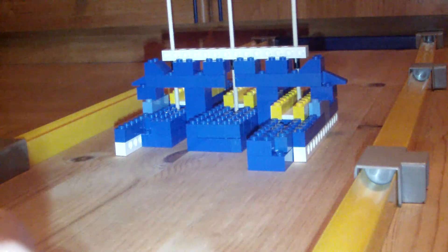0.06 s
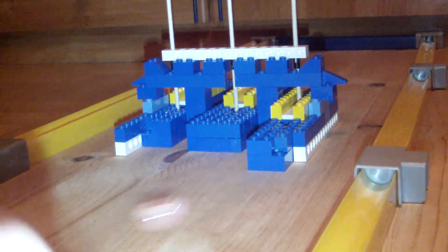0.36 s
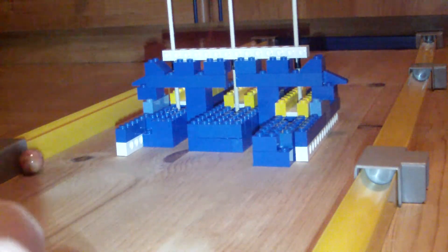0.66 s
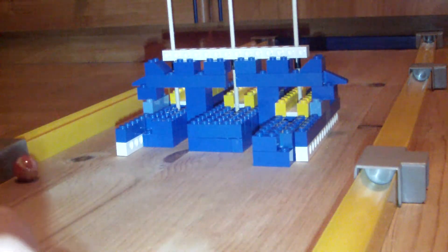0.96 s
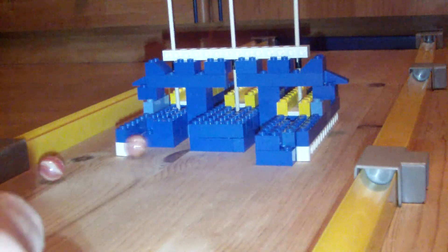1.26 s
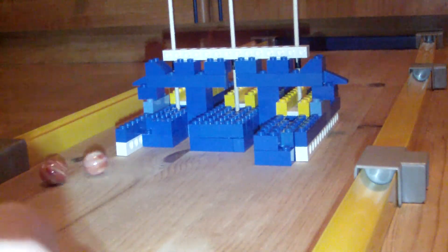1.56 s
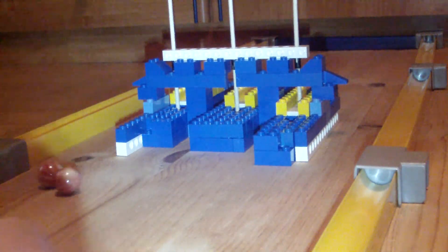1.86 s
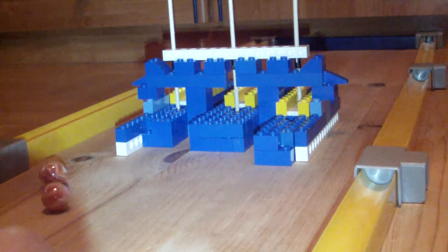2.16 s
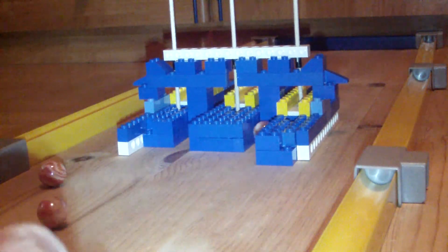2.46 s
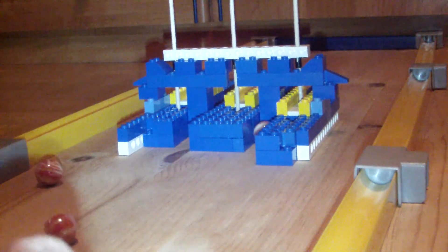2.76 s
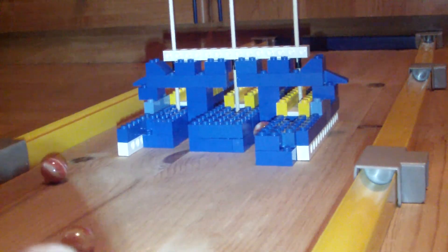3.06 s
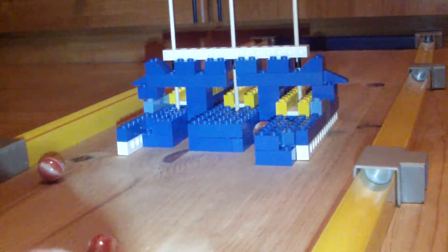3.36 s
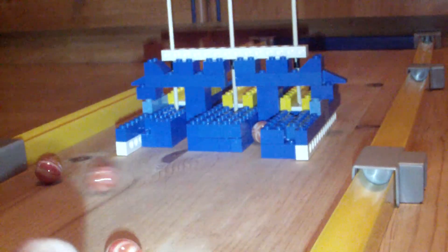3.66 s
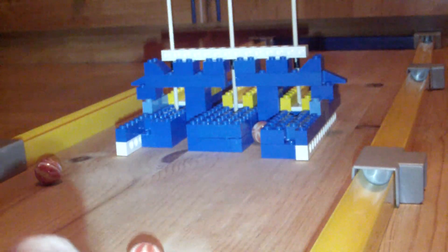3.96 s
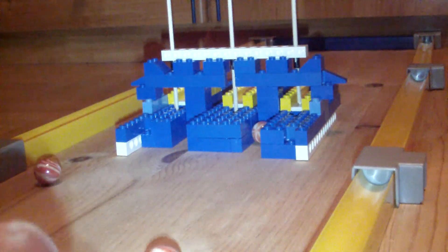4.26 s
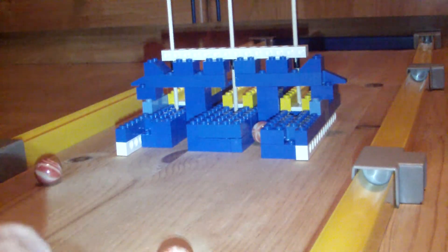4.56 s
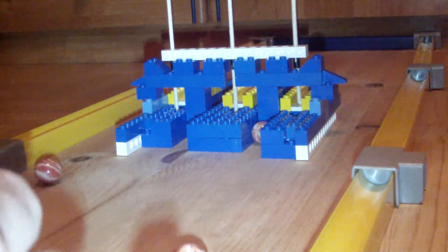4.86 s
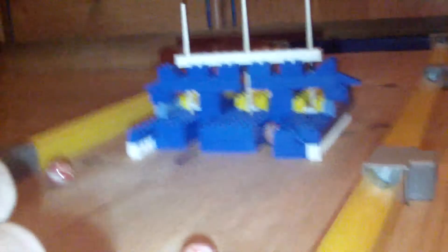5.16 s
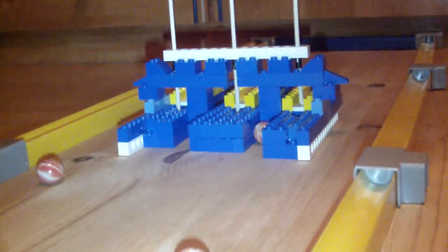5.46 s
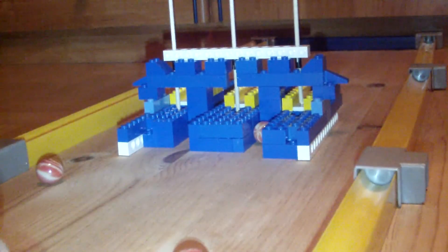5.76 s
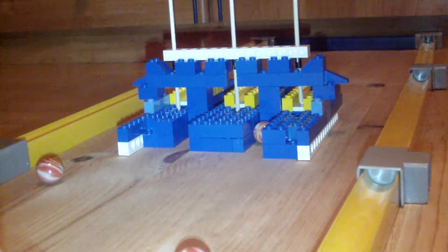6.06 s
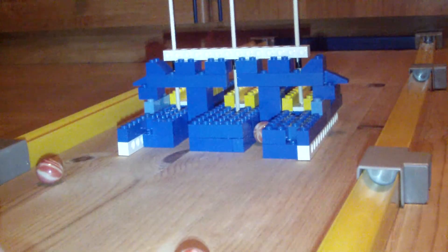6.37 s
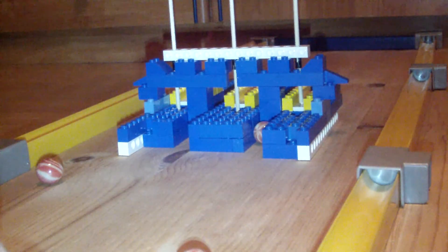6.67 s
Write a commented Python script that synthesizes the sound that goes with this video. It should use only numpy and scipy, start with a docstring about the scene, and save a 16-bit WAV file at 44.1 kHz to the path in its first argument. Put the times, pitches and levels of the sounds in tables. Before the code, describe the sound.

A toy launcher snaps at about 0.3 seconds, and a glass marble bounces on a wooden board with hollow knocks, rolls briefly and clacks brightly against plastic bricks. More shots come at 1.0, 2.2 and 3.4 seconds, each followed by knocks, a faint grainy roll and a quick burst of hard clacks and rattles. At 1.3 and 2.3 seconds a hit leaves a thin, high ring in a metal rail. From 4 to 5 seconds there are only soft ticks. Just after 5 seconds a loud, low thump jolts the microphone, followed by plastic clatter until 5.5. After a short pause, a small ping at 6.2 seconds leads into a last dense run of clacks up to about 6.8. Everything is close, in a small, quiet room with little echo, and the hardest hits slightly overload the microphone.

```python
"""Glass marbles clatter among plastic bricks and rails on a wooden board in a small room.
A toy launcher flicks them off with a snap of its lever; they bounce with hollow knocks, roll with
a grainy rattle and hit the bricks in bright bursts of clacks, now and then setting a metal rail singing.
Jolts thump through the support of a nearby camera, whose microphone overloads on the hardest hits."""
import sys
import numpy as np
from scipy import signal
from scipy.fft import rfft, irfft, next_fast_len
from scipy.io import wavfile

SR = 44100
rng = np.random.default_rng(int(sys.argv[2]) if len(sys.argv) > 2 else 0)


def pcm_store(signal):
    """Save signal as 16-bit PCM."""
    levels = np.round(np.clip(np.atleast_2d(signal), -1, 1) * 32767)
    wavfile.write(sys.argv[1], SR, levels.astype(np.int16).T)


N = 300762
SIZE = 16384  # samples in a one-shot
T = np.arange(SIZE) / SR
HZ = np.fft.rfftfreq(SIZE, 1 / SR)

# room tone EQ: freq_hz, level_db
HUSH_EQ = [(25,-5.5),(150,-10.5),(400,-19.5),(750,-26),(1000,-26.5),(1500,-33.5),(5000,-38),(16000,-45)]
# reverb time of the room: freq_hz, t60_s
ROOM_DECAY = [(200, 0.31), (1500, 0.27), (5000, 0.22), (14000, 0.022)]
# jolts through the camera's support: start_s, level_db, pitch_hz, t60_s
CAMERA_JOLTS = [(3.356,-17,46.8,0.096),(5.055,0,58.4,0.093),(5.062,7,514,0.01),(5.064,3,1100,0.0095),(5.136,-18,37.8,0.29),(5.207,-17,31.6,0.31)]
# marbles rolling over the board: start_s, length_s, level_db
ROLL_CUES = [(.3,.33,-38),(1.08,.23,-32),(1.6,0.93,-71),(2.3,0.09,-35.5),(2.55,0.089,-53.5),(3.42,0.067,-26),(3.78,0.072,-39.5),(4,0.18,-58),(4.55,0.18,-56.5),(5.19,0.34,-48),(5.597,.25,-55.5),(6.42,0.2,-41.5),(6.76,0.096,-34)]
# EQ of their rattle: freq_hz, level_db
RATTLE_EQ = [(100, -28), (600, -7.5), (1000, 0.5), (1800, -3.5), (4000, -6), (6500, -5), (10000, -16),
             (16000, -24)]
# marbles rolling close by: start_s, length_s, level_db
RUMBLE_CUES = [(1.05,.45,-49),(2.45,.42,-48)]
# EQ of their rumble: freq_hz, level_db
RUMBLE_EQ = [(25,2),(50,-11.5),(200,-20),(400,-41)]
# hits that set a metal rail singing: start_s, level_db
RAIL_HITS = [(1.28,-35),(2.328,-27)]
# a marble on one small part: start_s, level_db, pitch_hz, t60_s
PING_HITS = [(6.157,-20.5,3600,.015),(6.157,-27.5,1405,.014),(6.772,-25.5,2860,0.06)]
# blows on the board (a big loss is a dead stop): start_s, level_db, centre_hz, bounce_loss_db
BOARD_KNOCKS = [(.332,-7,1824,5.5),(0.597,-12,1230,40),(1.065,-7.5,1850,5),(1.276,-16,1264,40),(2.253,-5.5,1798,4.5),(3.357,-12.5,1223,40),(3.465,-6,1853,9),(5.125,-27,1140,38.5)]
# hollow tone of the board: ratio_to_centre, level_db
WOOD_EQ = [(.06,-33.5),(.36,-27),(.52,-8.5),(.72,2.5),(1.4,-1),(2.05,-10.5),(2.6,-17.5),(3.6,-28.5),(8,-39)]
# crack of a hard hit on plastic: freq_hz, level_db
CRACK_EQ = [(60, -22.5), (300, -14.5), (620, -13.5), (1000, 1.5), (1800, -8), (3000, -7.5), (4300, -5),
            (5500, -3), (7200, -6), (9500, -13), (12000, -21.5), (16000, -29.5)]
# modes of the bricks on their board: pitch_hz, level_db
BRICK_MODES = [(1020,-5),(1320,-1.5),(2170,6),(2900,4),(3630,5.5),(5100,-1.5),(5720,-2.5),(6960,6),(9080,-0.5),(10900,-21.5)]
# launcher shots (body is the EQ near 1 kHz): start_s, level_db, body_db, bright_db
LAUNCHER_SHOTS = [(.256,-8,0.5,5),(.969,-12,4,4.5),(2.154,-11.5,2,5.5),(3.358,-6.5,0.5,3)]
# quick, fading rattles of plastic, from bricks or the launcher: start_s, level_db, fall_db_per_s, body_db
PLASTIC_RATTLES = [(.29,-15.5,331,0.5),(.58,-10.5,298.5,4.5),(.606,-10,228.5,1),(1.308,-12,203,3.5),(2.536,-19.5,404,2.5),(3.819,-18,221.5,-5),(5.096,-14.5,1003,-18.5),(5.173,-21,350.5,-22),(5.211,-16.5,388,-12),(5.327,-22,250,-6),(5.386,-16.5,239,-14.5),(6.549,-19,180,-9)]
# hard plastic clacks from marbles or the handled launcher: start_s, level_db, body_db, bright_db
PLASTIC_CLACKS = [(.378,-9,2.5,4),(.547,-27.5,0.5,-1),(.571,-17,4,2.5),(.6,-2.5,-4,1.5),(.626,-8,-1.5,4.5),(0.681,-19,-2,5),(.723,-27,-3,4),
                  (1.002,-18.5,-4.5,-2.5),(1.105,-15.5,4.5,3),(1.143,-12.5,-1,1.5),(1.179,-18,-8.5,-7),(1.214,-20,-3,5.5),(1.255,-20,-8.5,-4.5),(1.279,-7,19.5,5.5),(1.303,-7,7,6.5),(1.366,-14.5,-2.5,4),(1.435,-33.5,-2,4.5),
                  (2.309,-22,-5.5,-4),(2.33,-7.5,-13.5,6.5),(2.437,-18.5,-13,-6.5),(2.51,-29,0.5,5),(2.53,-16.5,7.5,8),(2.561,-12,-14.5,1.5),(2.651,-31,20,0),(2.667,-20.5,3,-2),(2.69,-24.5,0,6),(2.835,-41.5,4,-9),(3.048,-46,17.5,-10),
                  (3.409,-12.5,-3,6.5),(3.433,-6,-4,5),(3.47,-8,-6,2),(3.501,-6,1.5,3),(3.64,-17.5,-3.5,-6.5),(3.722,-13.5,-6.5,-3),(3.746,-16,8,-3.5),(3.796,-12.5,2,6),(3.814,-7.5,-4,-6.5),(3.984,-37.5,-16,-2.5),
                  (4.138,-37,6,4),(4.284,-41,13.5,-3.5),(4.432,-32,4.5,-12),(4.518,-28.5,12.5,3),(4.769,-34,-5,-1),(4.856,-39,-14,-4.5),
                  (5.059,-12,-0.5,-1.5),(5.093,-15,-14.5,8),(5.168,-12.5,-14,8.5),(5.204,-14,-12,4),(5.221,-19.5,-19,5),(5.35,-12,-14,3.5),(5.379,-6,-10,2.5),(5.478,-20.5,-6,3),(5.733,-38,-20,-5),
                  (6.31,-22,-9.5,1),(6.352,-28.5,2,-1.5),(6.384,-17.5,1.5,-0.5),(6.41,-9,-3,6),(6.438,-22,-2,1),(6.461,-11.5,5,-1),(6.47,-18,-12,3),(6.496,-5,3,4.5),(6.531,-13.5,4,2.5),(6.577,-19.5,-12,13),(6.601,-17,-7,0.5),(6.686,-21,3,3.5),(6.716,-8.5,-1,4.5),(6.79,-7.5,-3,1)]


def amp(db):
    """Decibels to gain."""
    return 10 ** (np.asarray(db) / 20)


def fade(t, t60):
    """Exponential decay that loses 60 dB in t60 seconds."""
    return np.exp(-np.log(1000) * t / np.maximum(t60, 1e-3))


def unit(x):
    """Scale to rms 1."""
    return x / np.sqrt(np.mean(x ** 2) + 1e-20)


def unit_attack(x):
    """Scale a hit so that its first 6 ms have rms 1."""
    return x / np.sqrt(np.mean(x[:round(.006 * SR)] ** 2) + 1e-20)


def along(points, hz):
    """Read a curve of breakpoints on a log frequency axis."""
    freqs, values = np.transpose(points)
    return np.interp(np.log(hz + 1e-6), np.log(freqs), values)


def track_eq(x, gain):
    """EQ a whole track; gain is a function of frequency."""
    size = next_fast_len(N + SIZE)
    return irfft(rfft(x, size) * gain(np.fft.rfftfreq(size, 1 / SR)), size)[:N]


def hit_eq(x, curve_db):
    """Minimum-phase EQ for a one-shot, so nothing sounds before the contact."""
    cepstrum = irfft(np.log(amp(curve_db)))
    cepstrum[1:SIZE // 2] *= 2
    cepstrum[SIZE // 2 + 1:] = 0
    return irfft(rfft(x) * np.exp(rfft(cepstrum)))


def add(track, start_s, sound):
    """Mix a sound into the track at its cue."""
    start = max(round(start_s * SR), 0)
    part = track[start:start + len(sound)]
    part += sound[:len(part)]


def room_tone(level_db):
    """A quiet bed of room rumble and microphone hiss."""
    return amp(level_db) * unit(track_eq(rng.standard_normal(N), lambda hz: amp(along(HUSH_EQ, hz))))


def in_room(hit, tail_db, wall_db, wall_s):
    """The dry hit, a scattered slap off the nearest wall and a diffuse tail that darkens."""
    hz, t, spectrum = signal.stft(rng.standard_normal(SIZE), SR, nperseg=256)
    tail = signal.istft(spectrum * fade(t, along(ROOM_DECAY, hz)[:, None]), SR, nperseg=256)[1][:SIZE]
    tail *= 1 - np.exp(-(T / 0.0066) ** 2)
    wall = rng.standard_normal(SIZE) * (T > wall_s) * fade(np.abs(T - wall_s), t60=0.064)
    reverb = amp(tail_db) * tail / np.linalg.norm(tail) + amp(wall_db) * wall / np.linalg.norm(wall)
    return hit + signal.fftconvolve(hit, reverb)[:SIZE]


def thump(pitch_hz, t60):
    """A quickly damped swing with a soft attack."""
    return np.sin(2 * np.pi * pitch_hz * T) * fade(T, t60) * (1 - np.exp(-T / 0.0022))


def camera_jolts():
    """The camera rocks with a low thump; the hardest jolt also knocks its case."""
    out = np.zeros(N)
    for start_s, level_db, pitch_hz, t60 in CAMERA_JOLTS:
        add(out, start_s, amp(level_db) * thump(pitch_hz, t60))
    return out


def roll_envelope(cues, rise_db_per_s=699, fall_db_per_s=108):
    """Each roll comes in fast, holds and dies away."""
    t = np.arange(N) / SR
    gain = np.zeros(N)
    for start_s, length_s, level_db in cues:
        attack_db = rise_db_per_s * np.maximum(start_s - t, 0)
        release_db = fall_db_per_s * np.maximum(t - start_s - length_s, 0)
        gain += amp(level_db - attack_db - release_db)
    return gain


def rolling(ticks_per_s, tick_t60, rub_db):
    """Marbles ride the wood grain: tiny uneven bumps on a smooth rub, and a rumble when they come near."""
    sizes = amp(rng.uniform(-14, 0, N))
    ticks = (rng.random(N) < ticks_per_s / SR) * sizes
    bumps = signal.fftconvolve(ticks, fade(T, tick_t60))[:N]
    contact = unit(bumps * rng.standard_normal(N)) + amp(rub_db) * rng.standard_normal(N)
    rattle = unit(track_eq(contact, lambda hz: amp(along(RATTLE_EQ, hz))))
    rumble = unit(track_eq(rng.standard_normal(N), lambda hz: amp(along(RUMBLE_EQ, hz))))
    return roll_envelope(ROLL_CUES) * rattle + roll_envelope(RUMBLE_CUES) * rumble


def metal_rail(ring_hz, half_width_hz, t60):
    """A struck metal rail sizzles on in a tight cluster of high modes."""
    envelope = np.zeros(N)
    for start_s, level_db in RAIL_HITS:
        add(envelope, start_s, amp(level_db) * fade(T, t60))
    sizzle = track_eq(rng.standard_normal(N), lambda hz: 1 / (1 + ((hz - ring_hz) / half_width_hz) ** 2))
    return envelope * unit(sizzle)


def snap(t60):
    """The transient of a hard contact: a noise burst with a sharp attack."""
    return rng.standard_normal(SIZE) * fade(T, t60) * (1 - np.exp(-T / .0005))


def pings(crack_db):
    """A marble hits a small part: one clear, well-damped note over a broad crack."""
    out = np.zeros(N)
    for start_s, level_db, pitch_hz, t60 in PING_HITS:
        ring = unit_attack(np.sin(2 * np.pi * pitch_hz * T) * fade(T, t60) * (1 - np.exp(-T / .0003)))
        crack = unit_attack(hit_eq(snap(t60), along(WOOD_EQ, HZ / pitch_hz)))
        ping = in_room(ring + amp(crack_db) * crack, tail_db=-19, wall_db=-21, wall_s=.01)
        add(out, start_s, amp(level_db) * ping)
    return out


def board_knocks(contacts, t60, flight_s, flight_ratio, pitch_ratio):
    """Glass on wood: a short, hollow knock; each bounce comes sooner, weaker and lower."""
    out = np.zeros(N)
    for at_s, level_db, centre_hz, loss_db in BOARD_KNOCKS:
        for k in range(contacts):
            tone_db = along(WOOD_EQ, HZ / (centre_hz * pitch_ratio ** k))
            board = unit_attack(hit_eq(rng.standard_normal(SIZE) * fade(T, t60), tone_db))
            knock = in_room(board, tail_db=-11, wall_db=-18, wall_s=0.012)
            add(out, at_s, amp(level_db - loss_db * k) * knock)
            at_s += flight_s * flight_ratio ** k
    return out


def brick_ring(decay_s, scatter_db=5.2, detune_share=.04):
    """The bricks' main modes, with a fresh balance and tuning on every hit."""
    pitch_hz, level_db = np.transpose(BRICK_MODES)[:, :, None]
    t = T[:SIZE // 4]
    strength, detune, phase = rng.standard_normal((3, len(BRICK_MODES), 1))
    t60 = decay_s * (3000 / pitch_hz) ** 0.31  # high modes die sooner
    tones = np.sin(2 * np.pi * (pitch_hz * (1 + detune_share * detune) * t + phase))
    modes = amp(level_db + scatter_db * strength) * fade(t, t60) * tones
    return unit_attack(modes.sum(0) * (1 - np.exp(-t / 0.000057)))


def clack(body_db, bright_db, decay_s=0.031, ring_db=-3, glint_db=-11.5):
    """A hard hit on plastic: a dense crack, layered with the bricks' ring and a glassy glint on top."""
    hit = unit_attack(hit_eq(snap(0.74 * decay_s), along(CRACK_EQ, HZ)))
    add(hit, 0, amp(ring_db) * brick_ring(0.9 * decay_s))
    glint = hit_eq(snap(t60=0.01), along([(3375, -20), (6750, 0), (16000, -6)], HZ))
    hit += amp(glint_db) * unit_attack(glint)
    # the spot that is struck decides how much board and how much treble speak
    spot_db = along([(600, 0.031), (1030, body_db), (1900, 0), (3800, 0.0024), (5500, bright_db)], HZ)
    return in_room(unit_attack(hit_eq(hit, spot_db)), tail_db=-15.5, wall_db=-23, wall_s=0.019)


def stray_ticks(count, level_db, scatter_db):
    """Loose marbles touch now and then with a faint, dull tick."""
    out = np.zeros(N)
    for when, size in zip(rng.random(count), rng.standard_normal(count)):
        add(out, when * N / SR, amp(level_db + scatter_db * size) * clack(body_db=5, bright_db=-10))
    return out


def launcher(contacts, gap_s, gap_ratio, decay_s, catch_lead_s=0.0087, catch_db=-19.5, kick_db=-8):
    """The catch clicks; the lever snaps against its stop, kicks the board and rebounds ever more slowly."""
    out = np.zeros(N)
    for at_s, level_db, body_db, bright_db in LAUNCHER_SHOTS:
        add(out, at_s - catch_lead_s, amp(level_db + catch_db) * clack(body_db, bright_db, decay_s))
        add(out, at_s, amp(level_db + kick_db) * thump(pitch_hz=120, t60=0.028))
        for k in range(contacts):
            loss_db = 0.77 * k ** 2
            add(out, at_s, amp(level_db - loss_db) * clack(body_db, bright_db, decay_s))
            at_s += gap_s * gap_ratio ** k
    return out


def plastic_clatter(rattle_contacts, gap_s, scatter_db):
    """Marbles and the handled launcher knock on plastic: single clacks and quick, fading rattles."""
    out = np.zeros(N)
    for start_s, level_db, body_db, bright_db in PLASTIC_CLACKS:
        add(out, start_s, amp(level_db) * clack(body_db, bright_db))
    for start_s, level_db, fall_db_per_s, body_db in PLASTIC_RATTLES:
        age_s = 0
        for jitter, size in rng.standard_normal((rattle_contacts, 2)):
            gain = amp(level_db - fall_db_per_s * age_s + scatter_db * size)
            add(out, start_s + age_s, gain * clack(body_db, bright_db=2))
            age_s += gap_s * np.exp(0.38 * jitter)
    return out


def scene():
    """The mono mix at the microphone: hits up front, rolls, jolts and room tone underneath."""
    hits = launcher(contacts=4, gap_s=.008, gap_ratio=1.5, decay_s=0.054)
    hits += plastic_clatter(rattle_contacts=9, gap_s=.011, scatter_db=2)
    hits += stray_ticks(count=24, level_db=-54, scatter_db=3.5)
    hits += board_knocks(contacts=3, t60=0.016, flight_s=.076, flight_ratio=.47, pitch_ratio=0.94)
    hits += pings(crack_db=-5)
    hits += metal_rail(ring_hz=9450, half_width_hz=420, t60=0.35)
    rolls = rolling(ticks_per_s=200, tick_t60=0.018, rub_db=-0.5)
    return (hits + rolls + camera_jolts() + room_tone(level_db=-52.5))[None]


def record(dry):
    """The camera's colour: a notch near 8 kHz, soft clipping on the hardest peaks, a steep 16 kHz cut."""
    notched = signal.lfilter(*signal.iirnotch(7930, Q=6.5, fs=SR), dry[0])
    clipped = notched / (1 + np.abs(notched) ** 6) ** (1 / 6)
    return track_eq(clipped, lambda hz: 1 / (1 + (hz / 16000) ** 90))[None]


dry = scene()
out = record(dry)
pcm_store(out)
```